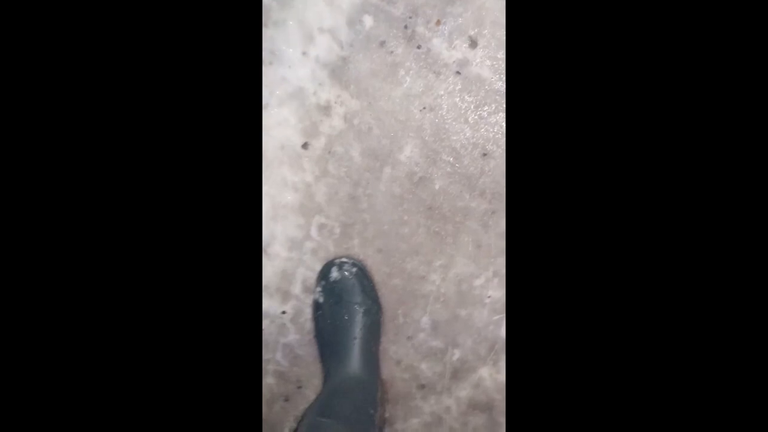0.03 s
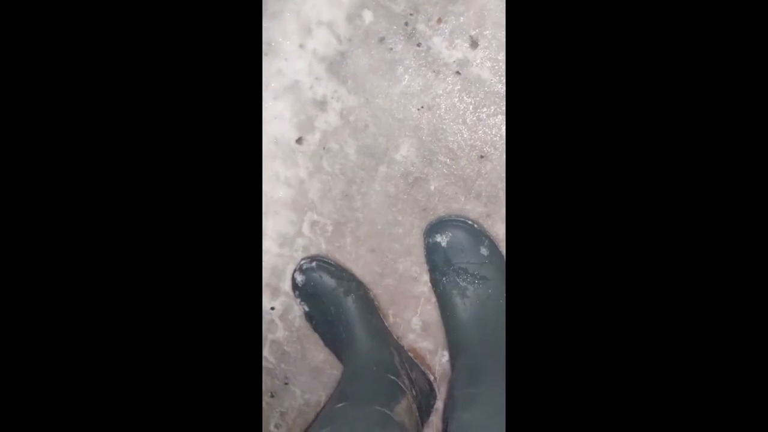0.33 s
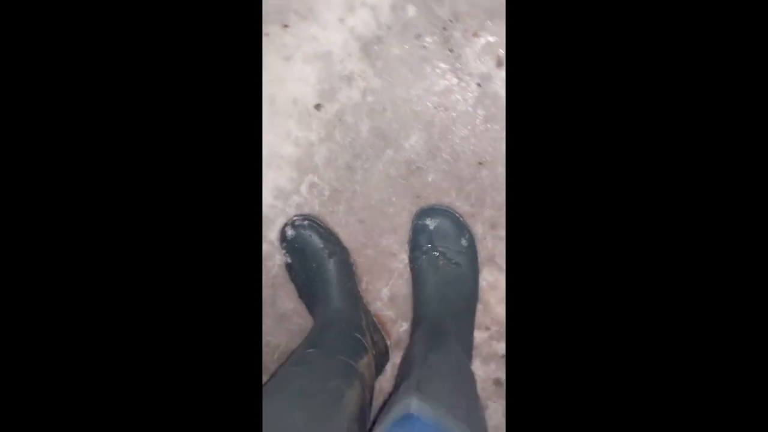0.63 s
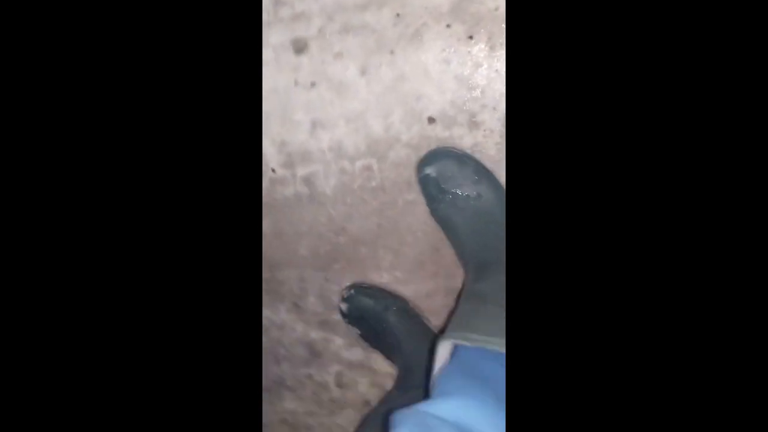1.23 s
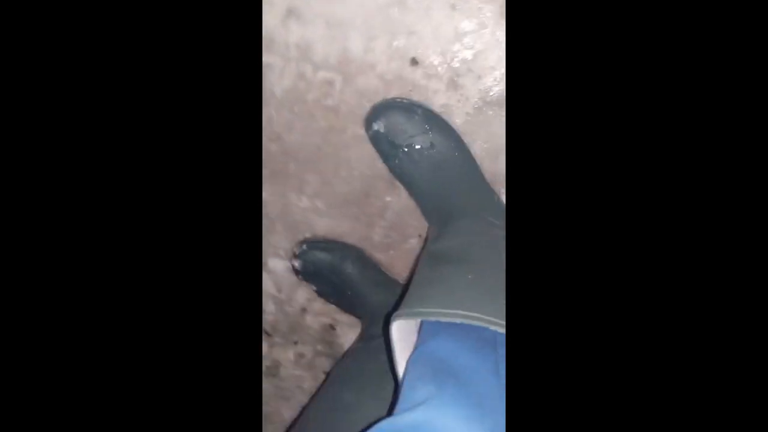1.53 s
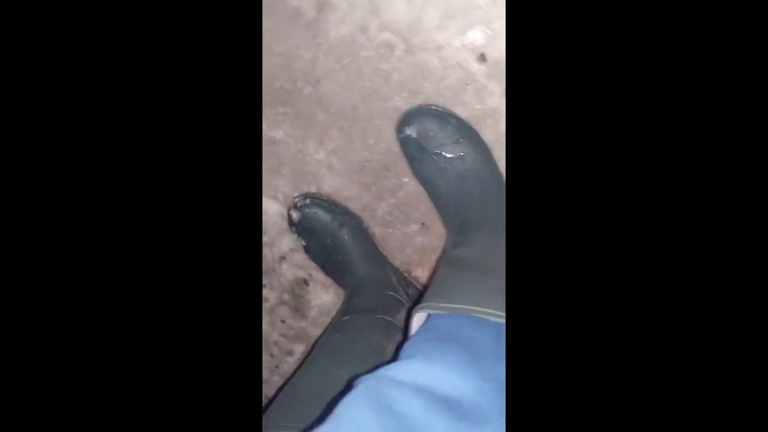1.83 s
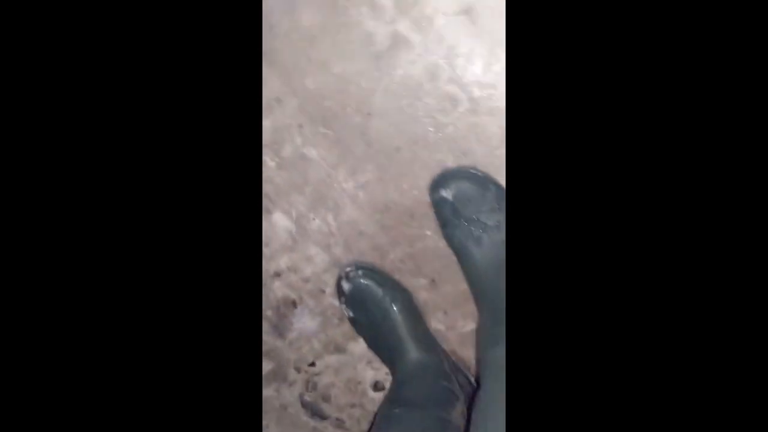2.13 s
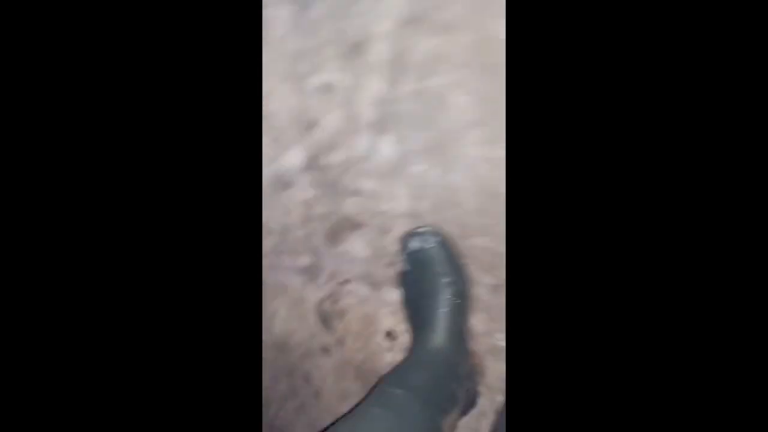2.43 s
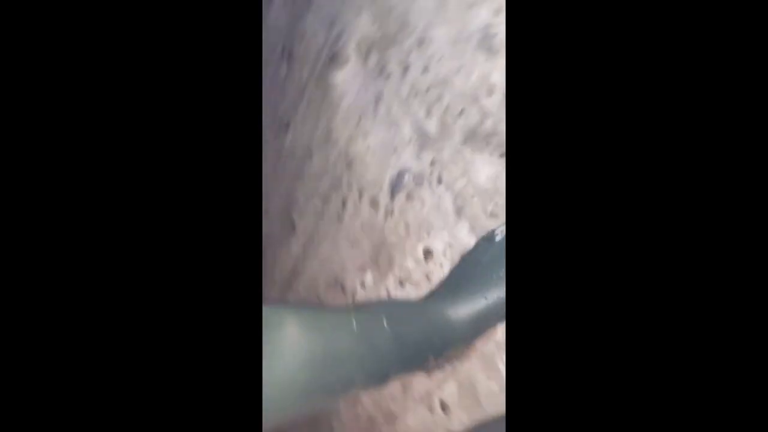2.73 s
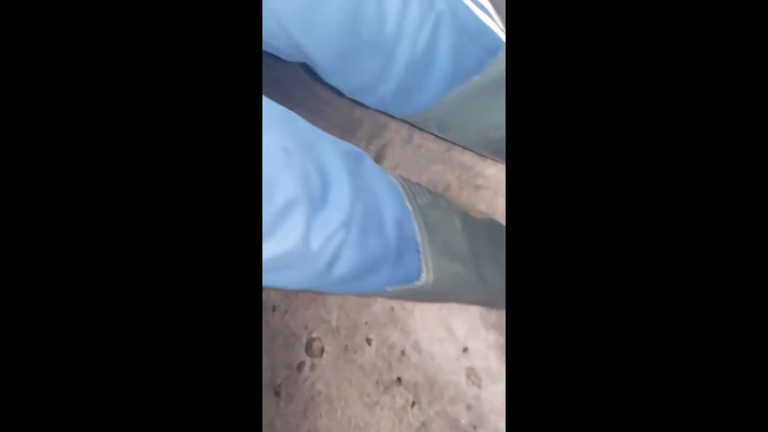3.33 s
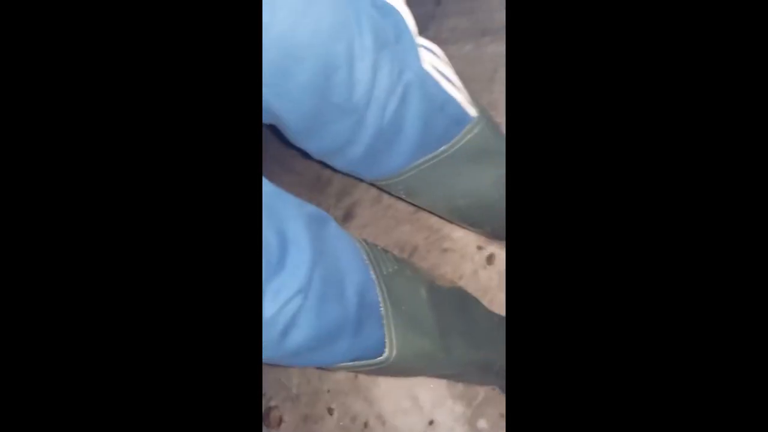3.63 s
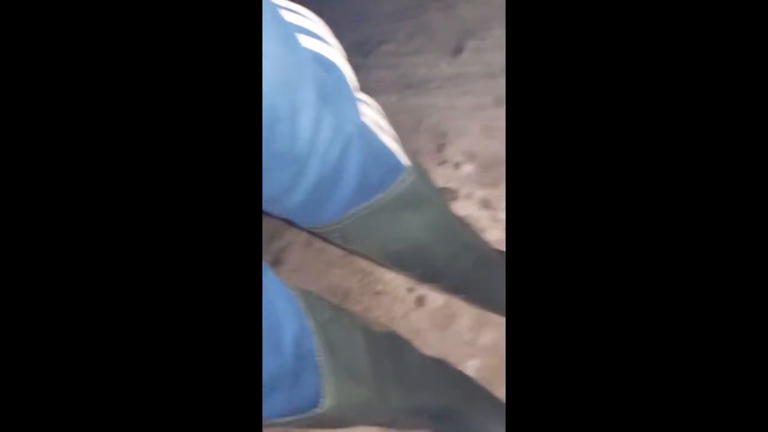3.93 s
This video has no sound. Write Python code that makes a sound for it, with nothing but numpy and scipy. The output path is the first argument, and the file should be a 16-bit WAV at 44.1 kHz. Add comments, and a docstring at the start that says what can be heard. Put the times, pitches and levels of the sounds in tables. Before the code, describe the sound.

Rubber boots scuff on packed, icy snow at the start, then more lightly from 1 to just past 2 seconds, with sharp little ice ticks. Wind rumbles and thumps on the microphone, hitting both sides near 0.8 seconds. A lull around 2.5 seconds leaves faint distant hiss and one tick. Just after 3 seconds the strongest gust strikes the left, and trouser cloth swishes softly until about 4 seconds.

```python
"""Rubber boots scuff and slide on packed, icy snow under a hand-held camera; ice grains tick.
Gusts buffet the two microphone ports separately, with a few hard thumps, and hit both near 0.8 s.
The scuffs end soon after 2 s; the far hiss underneath changes colour as the camera moves over the
ground. From 3 s trouser cloth swishes and the strongest gust strikes the left port."""
import sys
import numpy as np
from scipy import signal
from scipy.fft import rfft, irfft, next_fast_len
from scipy.io import wavfile
from scipy.ndimage import uniform_filter1d, map_coordinates

SR = 44100
rng = np.random.default_rng(int(sys.argv[2]) if len(sys.argv) > 2 else 0)


def pcm_store(signal):
    """Save signal as 16-bit PCM."""
    levels = np.round(np.clip(np.atleast_2d(signal), -1, 1) * 32767)
    wavfile.write(sys.argv[1], SR, levels.astype(np.int16).T)


N = 176400

# wind per port, before trim (time [s], rumble [dB], flutter [dB])
GUSTS_LEFT = [(0, -32, -42), (0.14, -40, -60.5), (0.22, -40, -48), (0.42, -43, -66), (0.58, -37, -66),
              (0.68, -28.5, -49), (0.72, -27.5, -34), (0.93, -28.5, -34), (0.98, -31, -45),
              (1.1, -35.5, -58), (1.28, -38.5, -57), (1.38, -35, -42), (1.58, -35.5, -51.5),
              (1.68, -28.5, -42), (1.77, -34, -48), (1.83, -29, -38.5), (1.94, -28, -41),
              (2.03, -36.5, -53), (2.14, -26.5, -40.5), (2.4, -38.5, -60), (2.85, -42, -68),
              (3.02, -33, -59), (3.06, -22, -30), (3.17, -19, -28.5), (3.23, -33, -43.5),
              (3.43, -29.5, -46.5), (3.65, -36.5, -56.5), (3.82, -25.5, -43.5), (4, -38, -69.5)]
GUSTS_RIGHT = [(0, -41, -56), (0.2, -33, -48), (0.38, -43.5, -66.5), (0.6, -34.5, -59.5),
               (0.71, -27.5, -35.5), (0.94, -27.5, -32.5), (1.01, -29, -38), (1.15, -34.5, -44),
               (1.3, -30.5, -39), (1.55, -30.5, -47.5), (1.7, -43.5, -58.5), (2.15, -37.5, -51.5),
               (2.35, -44.5, -69), (2.88, -45, -72), (2.95, -35, -56), (3.3, -39.5, -54),
               (3.55, -40.5, -51.5), (3.88, -36, -54), (4, -48, -75)]
# wind layer spectra (frequency [Hz], gain [dB])
RUMBLE_SPECTRUM = [(12, -13), (28, -1.5), (45, 1), (80, -0.5), (130, -5), (200, -15), (300, -27),
                   (1500, -90)]
FLUTTER_SPECTRUM = [(60, -15), (150, 0.5), (250, 1.5), (370, -6.5), (520, -14.5), (750, -29.5),
                    (1200, -44.5), (4000, -90)]
EDGE_SPECTRUM = [(200, -16.5), (450, 2), (650, -2), (900, -9), (1300, -24), (2200, -48.5), (6000, -84.5)]
RUMBLE_TRIM_DB, FLUTTER_TRIM_DB, EDGE_TRIM_DB = 1.5, 2, -5
STRONG_GUST_DB, EDGE_DB_PER_DB = -32.5, 1.342

def wind(gusts):
    """Turbulence on one port: rumble, faster flutter, and a bright edge in strong gusts."""
    rumble_db, flutter_db = curves(gusts)
    edge_db = STRONG_GUST_DB + EDGE_DB_PER_DB * (flutter_db - STRONG_GUST_DB)
    lumps = unit(amp(3.86 * np.clip(wobble(70), -1.7, 1.7)))
    rumble = turbulence(RUMBLE_SPECTRUM, lump_db=2.5, lumps_per_s=30, window_samples=3000)
    flutter = turbulence(FLUTTER_SPECTRUM, lump_db=2.5, lumps_per_s=45, window_samples=1200)
    edge = turbulence(EDGE_SPECTRUM, lump_db=5, lumps_per_s=150, window_samples=600)
    return (amp(rumble_db + RUMBLE_TRIM_DB) * rumble
            + amp(flutter_db + FLUTTER_TRIM_DB) * lumps * flutter
            + amp(edge_db + EDGE_TRIM_DB) * lumps * edge)


def turbulence(spectrum, lump_db, lumps_per_s, window_samples):
    """Noise levelled over a window, then broken into short lumps."""
    noise = coloured(rng.standard_normal(N), spectrum)
    local_rms = np.sqrt(np.abs(uniform_filter1d(noise ** 2, window_samples)) + 1e-6)
    return unit(noise / local_rms * amp(lump_db * np.clip(wobble(lumps_per_s), -1.8, 1.8)))


# single eddies (time [s], peak [dB], pitch [Hz], push or suck, port)
EDDIES = [(.037, -14.5, 62, "push", "left"), (.203, -23, 95, "push", "left"),
          (.216, -23, 95, "push", "left"), (.331, -15, 56, "push", "left"),
          (.516, -22, 100, "push", "left"), (.563, -23, 105, "push", "left"),
          (.630, -3, 245, "suck", "left"), (.649, -18, 140, "push", "left"),
          (.707, -16, 150, "suck", "right"), (.719, -10, 160, "push", "left"),
          (.735, -11, 190, "suck", "right"), (.797, -11.5, 340, "push", "left"),
          (.800, -12, 150, "suck", "right"), (.872, -14, 170, "push", "right"),
          (.915, -4.5, 175, "push", "left"), (.922, -14, 130, "suck", "right"),
          (.976, -15, 300, "push", "right"), (1.021, -15.5, 445, "push", "left"),
          (1.421, -19, 280, "push", "right"), (1.667, -19.5, 240, "push", "left"),
          (1.922, -16, 170, "suck", "left"), (1.960, -15, 100, "suck", "left"),
          (2.134, -12, 160, "push", "left"), (2.263, -16, 115, "push", "left"),
          (2.947, -20, 90, "push", "right"), (3.056, -5, 205, "suck", "left"),
          (3.091, -6, 150, "suck", "left"), (3.137, -12, 170, "push", "left"),
          (3.147, -7.5, 185, "push", "left"), (3.160, -7.5, 175, "push", "left"),
          (3.295, -11, 145, "push", "left"), (3.435, -14.5, 100, "push", "left"),
          (3.510, -17.5, 65, "push", "left"), (3.798, -14, 70, "suck", "left"),
          (3.88, -20.5, 185, "suck", "left")]
# port -> (left [gain], right [gain])
PORT_GAINS = {"left": [[1], [0]], "right": [[0], [1]]}

def thumps():
    """Each eddy is one sharp push or suck of pressure on one port, with a rebound on either side."""
    out, t = np.zeros((2, N)), np.arange(SR // 16) / SR
    middle_s = t.mean()
    for time_s, peak_db, hz, kind, port in EDDIES:
        phase_squared = (2 * np.pi * hz * (t - middle_s) / 3.3) ** 2
        push = (1 - 7 * phase_squared) / (1 + phase_squared) ** 5
        pulse = push if kind == "push" else -push
        add(out, time_s - middle_s, amp(peak_db) * np.array(PORT_GAINS[port]) * pulse)
    return out


# sole sliding on snow (start [s], rise [s], hold [s], 20 dB fade [s], level [dB],
# resonance [Hz], powder re sole [dB], drag re sole [dB])
SLIDES = [(.0, .003, .028, .05, -31.5, 1560, -21, -17), (.163, .022, .006, .07, -43.5, 1680, -11, -3),
          (.194, .068, .028, .06, -35.5, 1827, -22, -14), (.982, .005, .01, .055, -43.5, 2100, -16, -4),
          (1.019, .001, .003, .018, -41, 1900, -17, -2), (1.03, .01, .03, .17, -57, 1950, -20, 0),
          (1.298, .04, .08, .04, -46, 1884, -15, .5), (1.416, .02, .11, .05, -51.5, 1843, -15, -4.5),
          (1.51, .035, .04, .035, -51, 2100, -19, -6), (1.659, .0266, .0214, .1, -55.5, 1860, -22, -5),
          (1.904, .0213, .0158, .0935, -48, 1890, -18, -6.5),
          (1.951, .0363, .078, .16, -57, 1900, -12, -6.5),
          (2.054, .08, .048, .036, -40.3, 1860, -22, -17.5)]
# slide layer spectra (frequency [Hz], gain [dB])
SOLE_SPECTRUM = [(150, -31), (500, -9.5), (1000, -5), (1700, -2.5), (2800, -5.5), (3700, -14), (5000, -23),
                 (7000, -31.5), (15000, -52)]
POWDER_SPECTRUM = [(1500, -19.5), (3500, 2.5), (6000, 2.5), (8000, -3.5), (11000, 1), (16000, -6)]
DRAG_SPECTRUM = [(80, -6.5), (250, -1), (500, 0.5), (800, -5), (1300, -17), (3000, -49)]
RING_DB, RING_WIDTH_LOG_HZ, POWDER_FADE_RATIO = 7, 0.1006, 1.4

def boots():
    """Grains break under the sliding sole and ring it; powder hisses and the boot drags dully."""
    out = np.zeros((2, N))
    for start_s, rise_s, hold_s, fade_s, level_db, ring_hz, powder_db, drag_db in SLIDES:
        grains = crunch()
        friction = pair(grains, shared_power=0.604)
        ring_db = lambda hz: RING_DB * bell(hz, ring_hz, RING_WIDTH_LOG_HZ)
        sole_gain = lambda hz: amp(along(SOLE_SPECTRUM, hz) + ring_db(hz))
        sole = unit(filtered(friction, sole_gain)) * pan(db=8.5)
        powder = amp(powder_db) * coloured(grains[1:], POWDER_SPECTRUM) * pan(db=-3)
        drag = amp(drag_db) * coloured(friction, DRAG_SPECTRUM) * pan(db=2)
        slide = stroke(rise_s, hold_s, fade_s) * (sole + drag)
        spray = stroke(rise_s, hold_s, fade_s * POWDER_FADE_RATIO) * powder
        add(out, start_s, amp(level_db) * (slide + spray))
    flicker_db = 1.29 * wobble(110)
    return out * amp(flicker_db)


def crunch(grains_per_s=1100, spread_db=5, grain_share=0.6):
    """Three half-second trains of snow grains breaking at random, over smooth friction noise."""
    shape = (3, SR // 2)
    breaks = rng.random(shape) < grains_per_s / SR
    size = amp(spread_db * np.clip(rng.standard_normal(shape), -2, 2))
    grains = unit(breaks * size * rng.choice([-1, 1], shape))
    return np.sqrt(grain_share) * grains + np.sqrt(1 - grain_share) * rng.standard_normal(shape)


# ice grains cracking (time [s], level [dB], pitch [Hz], left - right [dB])
ICE_CRACKS = [(.007, -20, 1597, 3.5), (.286, -21, 1700, 8), (.658, -46, 5500, 1), (.688, -32.5, 1500, 7.5),
              (.912, -42.5, 6500, 1.5), (.944, -29.5, 1325, -12.5), (1.0205, -22.5, 1900, 6),
              (1.0665, -30.5, 1770, -0.5), (1.339, -23.5, 1700, 10), (1.371, -21, 1700, 6),
              (1.396, -22, 2130, 7), (1.582, -34, 2600, 4), (1.6624, -42, 8530, 1),
              (1.6661, -34, 8800, -1.5), (2.129, -34.5, 7100, -2.5), (2.6567, -26, 7500, 4),
              (2.6573, -30.5, 3070, 20)]
SNAP_DECAY_CYCLES, CRUMBS_DB, CRUMBS_T60_S = 0.688, -21, 0.033

def ice():
    """Each crack is a snap of a few cycles and a faint scatter of crumbs."""
    out, t = np.zeros((2, N)), np.arange(SR // 20) / SR
    for time_s, level_db, hz, pan_db in ICE_CRACKS:
        attack = 1 - np.exp(-8 * hz * t)
        snap = np.sin(2 * np.pi * hz * t) * np.exp(-hz * t / SNAP_DECAY_CYCLES) * attack
        scatter = signal.fftconvolve(rng.standard_normal((2, len(t))), snap[None], axes=1)[:, :len(t)]
        crumbs = amp(CRUMBS_DB - 60 * t / CRUMBS_T60_S) * unit(scatter)
        add(out, time_s, amp(level_db) * pan(pan_db) * (snap + crumbs))
    return out


# legs brushing (start [s], rise [s], hold [s], 20 dB fade [s], level [dB], left - right [dB])
LEG_BRUSHES = [(3.029, 0.23, .04, 0.17, -59.5, -2), (3.249, 0.0443, 0.04, 0.2, -59.5, -6),
               (3.485, 0.04, 0.048, 0.04, -49, -11), (3.595, 0.02, 0.03, 0.07, -54.5, -10.5),
               (3.72, 0.1, .022, 0.035, -50.5, -6)]
# cloth friction (frequency [Hz], gain [dB])
CLOTH_SPECTRUM = [(600, -21), (1500, 0), (2800, 7), (4500, 5), (7500, -1.5), (10000, 1), (13000, 1),
                  (16000, -5)]

def trousers():
    """Cloth rubs on cloth in smooth, bright swishes."""
    out = np.zeros((2, N))
    for start_s, rise_s, hold_s, fade_s, level_db, pan_db in LEG_BRUSHES:
        cloth = coloured(rng.standard_normal((2, SR // 2)), CLOTH_SPECTRUM)
        add(out, start_s, amp(level_db) * pan(pan_db) * stroke(rise_s, hold_s, fade_s) * cloth)
    return out


# far hiss (frequency [Hz], gain [dB])
FAR_SPECTRUM = [(200, -9), (700, -8.5), (950, -3), (1800, -1.5), (2500, -4.5), (3200, -12.5), (4500, -22),
                (16000, -50)]
# its bright band as the camera turns (time [s], centre [Hz], height [dB])
BRIGHT_BAND = [(0, 1950, 2.5), (2.0, 1658, 3), (2.35, 1482, 6), (2.58, 1650, 3.5), (2.75, 1880, 9),
               (3.02, 1800, 9.5), (3.35, 1390, 3), (3.6, 1720, 5.5), (4, 1599, 4)]
FAR_DB, REFLECTION_DELAY_S, REFLECTION_RIPPLE_DB = -59.8, 0.0045, 2

def far_hiss():
    """Distant noise with a drifting bright band, combed by a shifting ground reflection."""
    hiss = coloured(pair(rng.standard_normal((3, N)), shared_power=0.286), FAR_SPECTRUM)
    hz, t, frames = signal.stft(hiss, SR, nperseg=1024)
    time_s, centre_hz, height_db = np.transpose(BRIGHT_BAND)
    band = bell(hz[:, None], np.interp(t, time_s, centre_hz), width_log_hz=0.183)
    band_db = np.interp(t, time_s, height_db) * band
    drift = np.interp(t, np.arange(N) / SR, wobble(2.5))
    delay_s = REFLECTION_DELAY_S * np.exp(.12 * drift)
    comb_db = REFLECTION_RIPPLE_DB * np.cos(2 * np.pi * hz[:, None] * delay_s)
    _, hiss = signal.istft(frames * amp(band_db + comb_db), nperseg=1024)
    return amp(FAR_DB) * pan(db=4) * unit(hiss[:, :N])


# air noise (frequency [Hz], gain [dB])
AIR_SPECTRUM = [(300, -8.5), (3000, 0.5), (5800, 3), (8000, -5), (11000, -1.5), (16000, -5)]
# its swell (time [s], level [dB])
AIR_SWELL = [(0, -73), (.9, -77), (1.1, -72.5), (2.3, -74.5), (2.7, -66.5), (2.95, -70), (4, -72)]

def air():
    """Thin noise, independent at each port."""
    return amp(curves(AIR_SWELL)[0]) * coloured(rng.standard_normal((2, N)), AIR_SPECTRUM)


def stroke(rise_s, hold_s, fade_s):
    """Half-second rubbing envelope; falls 20 dB per fade_s."""
    t = np.arange(SR // 2) / SR
    return np.clip(t / rise_s, 0, 1) ** 1.143 * amp(-20 * np.maximum(t - rise_s - hold_s, 0) / fade_s)


def amp(db):
    """Decibels to gain."""
    return 10 ** (np.asarray(db) / 20)


def unit(x):
    """Scale to rms 1."""
    return x / np.sqrt(np.mean(x ** 2) + 1e-20)


def along(points, hz):
    """Interpolate on a log frequency axis."""
    knots_hz, values = np.transpose(points)
    return np.interp(np.log(hz + 1), np.log(knots_hz + 1), values)


def bell(hz, centre_hz, width_log_hz):
    """Gaussian on a log frequency axis, peak 1."""
    return np.exp(-.5 * (np.log((hz + 1) / centre_hz) / width_log_hz) ** 2)


def curves(rows):
    """One value per sample for each column after the time."""
    time_s, *columns = np.transpose(rows)
    return [np.interp(np.arange(N) / SR, time_s, column) for column in columns]


def wobble(knots_per_s):
    """Smooth random curve."""
    knots = rng.standard_normal(int(N * knots_per_s / SR) + 4)
    return map_coordinates(knots, [np.arange(N) * knots_per_s / SR])


def filtered(x, response):
    """Apply the gain response(hz) to x."""
    n = x.shape[-1]
    n_fft = next_fast_len(n + 2048, True)
    return irfft(rfft(x, n_fft) * response(np.fft.rfftfreq(n_fft, 1 / SR)), n_fft)[..., :n]


def coloured(x, spectrum):
    """x shaped by a spectrum, at rms 1."""
    return unit(filtered(x, lambda hz: amp(along(spectrum, hz))))


def pan(db):
    """Stereo gains of mean power 1; db is left - right."""
    return unit(amp([[db / 2], [-db / 2]]))


def pair(three, shared_power):
    """Stereo from one shared and two separate signals."""
    return np.sqrt(shared_power) * three[0] + np.sqrt(1 - shared_power) * three[1:]


def add(out, start_s, sound):
    """Mix sound into out from start_s on."""
    part = out[..., max(round(start_s * SR), 0):][..., :sound.shape[-1]]
    part += sound[..., :part.shape[-1]]


def scene():
    """All sources at the two ports, in open air."""
    gusts = np.array([wind(GUSTS_LEFT), wind(GUSTS_RIGHT)])
    return gusts + thumps() + boots() + ice() + trousers() + far_hiss() + air()


BAND_LIMIT_HZ = 15850

def record(dry):
    """The camera keeps nothing above its band limit."""
    return filtered(dry, lambda hz: hz < BAND_LIMIT_HZ)


dry = scene()
out = record(dry)
pcm_store(out)
```